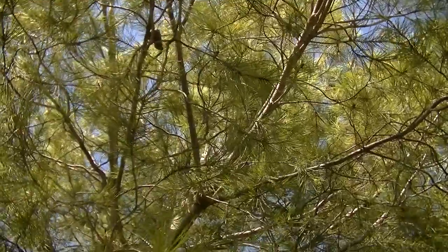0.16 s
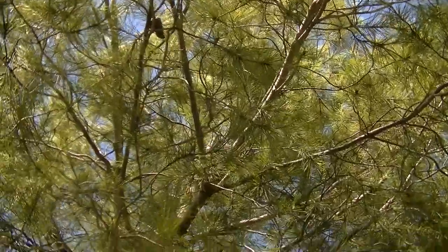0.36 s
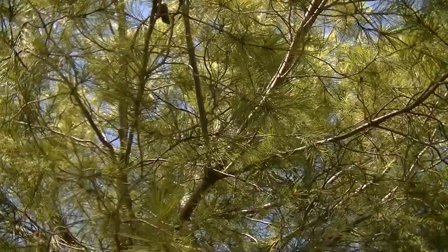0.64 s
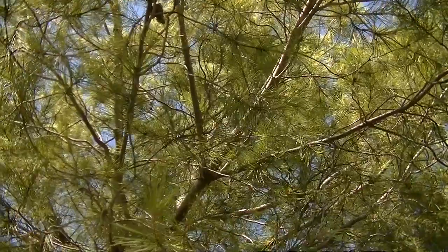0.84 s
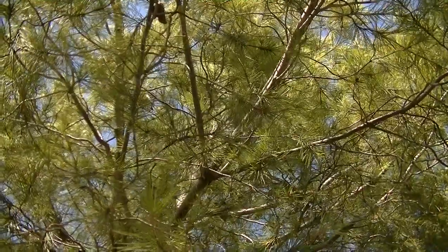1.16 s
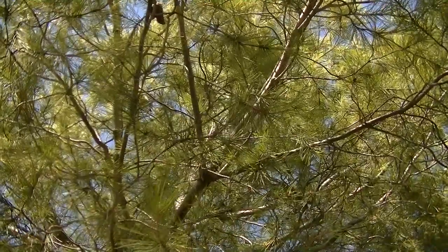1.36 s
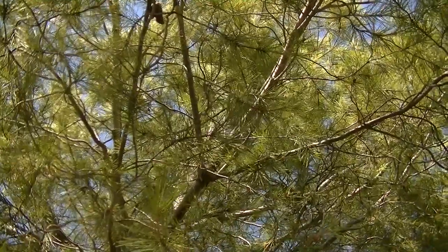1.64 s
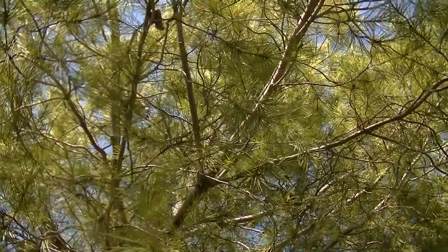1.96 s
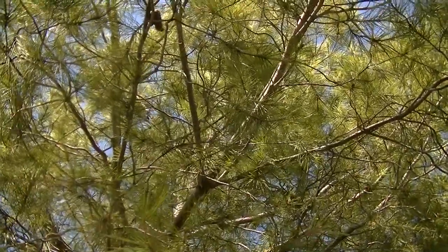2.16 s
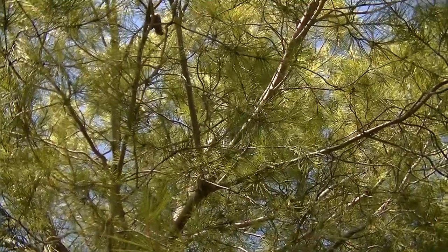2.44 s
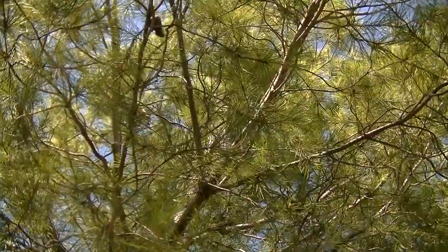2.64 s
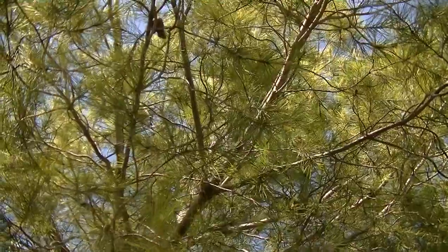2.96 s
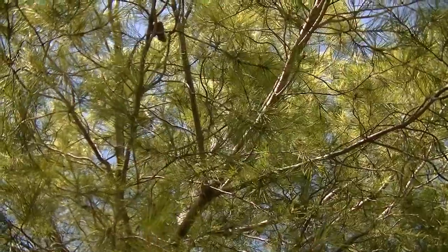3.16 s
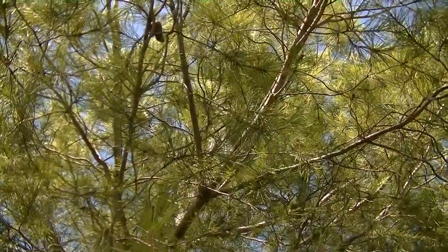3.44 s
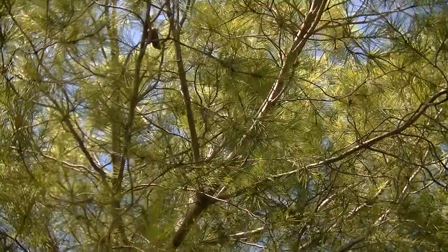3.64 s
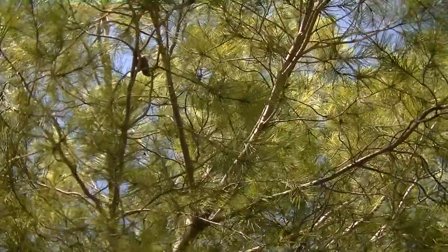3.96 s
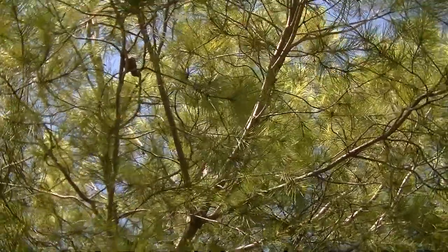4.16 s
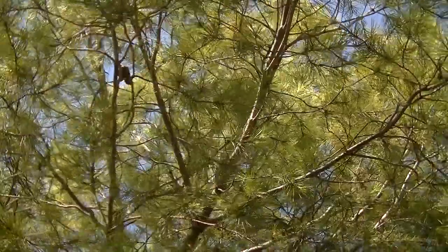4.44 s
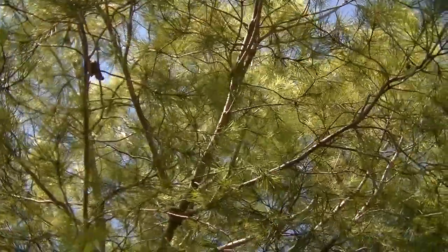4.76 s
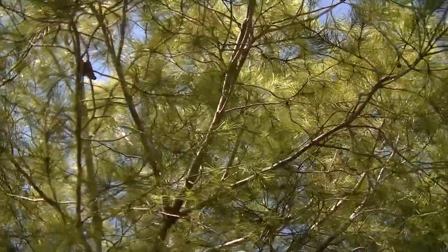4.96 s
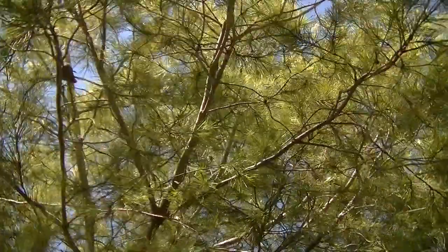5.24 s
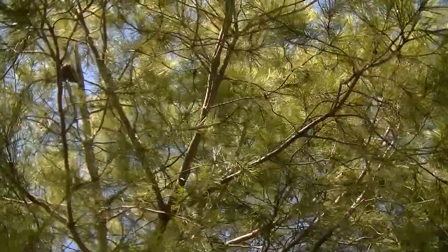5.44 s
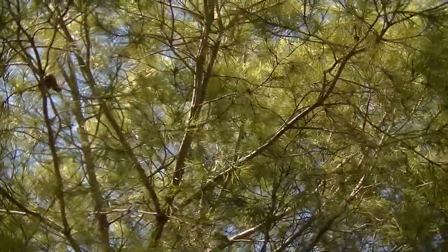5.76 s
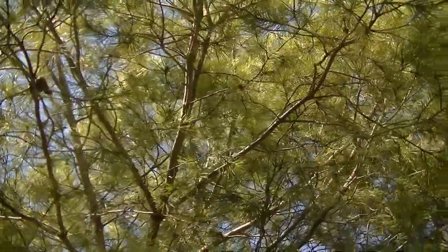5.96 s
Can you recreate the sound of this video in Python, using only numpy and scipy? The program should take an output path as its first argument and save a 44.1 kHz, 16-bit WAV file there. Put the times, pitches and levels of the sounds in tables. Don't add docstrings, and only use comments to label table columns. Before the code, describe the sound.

Outdoors under a pine, a lone cicada close overhead gives a steady, high, raspy buzz that eases slightly for over two seconds, then turns into fast throbs, about eleven a second, growing louder to the end. A hand-held camera's stereo microphones catch low wind bumps and a hard final slap. Far traffic washes faintly behind, with soft needle rustles later.

```python
import sys
import numpy as np
from scipy import signal
from scipy.io import wavfile
from scipy.ndimage import uniform_filter1d

SR = 44100
rng = np.random.default_rng(int(sys.argv[2]) if len(sys.argv) > 2 else 0)


def master_out(mix):
    frames = np.transpose(np.atleast_2d(mix))
    ceiling = np.clip(frames, -1, 1)
    pcm = np.round(ceiling * 32767).astype(np.int16)
    wavfile.write(sys.argv[1], SR, pcm)


def makeup_ratio(level_db):
    decades = np.asarray(level_db, float) / 20
    return 10 ** decades


N = 268569


def evened(x):
    return x / np.sqrt(np.mean(np.square(x)) + 1e-20)


def read_spectrum(points, hz):
    f, value = np.transpose(points)
    return np.interp(np.log(hz + 1), np.log(f + 1), value)


def curves(rows, t):
    s, *columns = np.transpose(rows)
    return [np.interp(t, s, c) for c in columns]


def resonate(x, hz, width):
    turn = np.exp(2j * np.pi * np.cumsum(hz * np.ones(len(x))) / SR)
    r = np.exp(-np.pi * width / SR)
    smooth = signal.lfilter([(1 - r) ** 2], [1, -2 * r, r * r], x / turn)
    return 2 * (turn * smooth).real


def hiss(spectrum, likeness, patchy_db, size):
    frames, hz = 4 * N // size + 5, np.fft.rfftfreq(size, 1 / SR)
    a, b, c, d, patches = rng.standard_normal((frames, len(hz), 5)).T
    patches = uniform_filter1d(patches, size=12, axis=0)
    patches = evened(uniform_filter1d(patches, size=10, axis=1))
    same = np.clip(read_spectrum(likeness, hz), -1, 1)[:, None]
    left = a + 1j * b
    right = same * left + np.sqrt(1 - same ** 2) * (c + 1j * d)
    z = np.array([left, right]) * makeup_ratio(read_spectrum(spectrum, hz)[:, None] + patchy_db * patches)
    return evened(signal.istft(z, nperseg=size, noverlap=size * 3 // 4)[1][:, :N])


# [f/Hz, level/dB per Hz]
WASH_SPECTRUM = [(18, -29), (30, -10), (75, 2), (142, -4.5), (232, -4.5), (476, -8), (916, -8),
                 (1630, -17.5), (3000, -22), (8000, -11), (15500, -47)]
# [t/s, level/dB]
WASH_LEVEL = [(0.0, -57.5), (1.25, -57.3), (3.17, -54.3), (6.09, -54.3)]
# [f/Hz, left-right likeness]
WASH_LIKENESS = [(100, 0.89), (500, .75), (1000, 0.79), (2500, 0.56), (8000, 1), (13000, .2)]
# [f/Hz, width/Hz, start t/s, stop t/s, level/dB]
HUMS = [
    (250, 3, 0.53, 2.9, -61.5),
    (420.6, 2.5, 1.5, 3.33, -66),
]


def traffic():
    t = np.arange(N) / SR
    out = makeup_ratio(curves(WASH_LEVEL, t)[0] + 6.5) * hiss(WASH_SPECTRUM, WASH_LIKENESS, 0.9, size=1024)
    for hz, width, start, stop, db in HUMS:
        passing = np.clip(np.minimum(t - start, stop - t) / 0.27, 0, 1)
        out += makeup_ratio(db) * passing * evened(resonate(rng.standard_normal(N), hz, width))
    return out


# [t/s, length/s, level/dB, centre f/Hz]
RUSTLES = [
    (3.7, 0.17, -65, 1969),
    (4.1, 0.11, -62, 2298),
    (4.341, .03, -63, 1500),
    (5.454, 0.11, -59.5, 2005),
    (5.715, 0.059, -61, 1798),
]


def rustles():
    t, out = np.arange(N) / SR, np.zeros((2, N))
    a, b = rng.standard_normal((2, N))
    for s, length, db, hz in RUSTLES:
        swell = np.exp(-((t - s) / length) ** 2)
        brush = [resonate(v, hz, 1500) for v in (a + 0.45 * b, a - 0.36 * b)]
        out += makeup_ratio(db) * swell * evened(brush)
    return out


# [peak t/s, level/dB, rise/s, fall/s, edge level/dB]
GUSTS = [(0.0, -46.5, .1, .2, -14), (0.2, -44, .05, .22, -8), (0.41, -37.5, .06, .02, -4),
         (0.88, -46.5, .11, .11, 0), (1.03, -37, .05, .07, 2), (1.19, -39, .11, .015, 2),
         (1.32, -40, .2, .04, -3), (1.52, -41, .04, .15, 8), (1.63, -48, .08, .05, 9),
         (1.91, -48, .1, .5, -4), (2.29, -44, .06, .15, -3), (2.46, -41.5, .12, .07, -8),
         (2.6, -49, .15, .05, -4), (2.7, -43.5, .04, .065, -1), (3.61, -43.5, .035, .25, -4),
         (3.71, -42, .1, .07, -8), (3.92, -34, .11, .025, 2), (4.02, -42, .05, .045, 0),
         (4.14, -40.5, .03, .017, -6), (4.21, -42.5, .025, .045, -2), (4.31, -43.5, .035, .055, -2),
         (4.46, -38, .09, .043, 3), (5.34, -43, .2, .12, -1), (5.48, -39.5, .04, .1, -8)]
# [peak t/s, level/dB, rise/s, fall/s, edge level/dB]
LAST_GUST = (6.01, -36, .06, .018, 19)


def gusts(t):
    calm_db, calm_edge_db = -63, -6
    slope_db = -12
    body, edge = makeup_ratio(calm_db) ** 2, makeup_ratio(calm_db + calm_edge_db) ** 2
    for s, db, rise, fall, edge_db in GUSTS + [LAST_GUST]:
        power = makeup_ratio(db + slope_db * np.maximum((s - t) / rise, (t - s) / fall)) ** 2
        body = body + power
        edge = edge + power * makeup_ratio(edge_db) ** 2
    return np.sqrt(body), np.sqrt(edge)


# [f/Hz, level/dB per Hz]
BUFFET_SPECTRUM = [(12, -37), (20, -13.5), (60, -0.5), (97, -2.5), (151, -7.5), (184, -20), (262, -27.5),
                   (404, -41), (700, -64), (910, -70), (1540, -120)]
# [t/s, peak level/dB, f/Hz, share on the right]
SLAPS = [(.398, -24, 160.1, 1.54), (1.033, -21, 130, 0.65), (1.058, -36, 300, 1.1), (1.571, -37, 260, 1.8),
         (2.343, -38, 250, 1.9), (2.7, -39, 220, 1), (3.859, -33, 260, 1.8), (3.914, -24, 151, 0.34),
         (4.435, -41, 240, 0.98), (5.348, -34, 120, .9), (5.99, -15, 100.3, 0.36), (5.997, -23, 270, 0),
         (6.0075, -26, 320, 3), (6.014, -24, 280, -.2), (6.02, -7.5, 150, 0.66)]


def wind():
    body, edge = gusts(np.arange(N) / SR)
    air = hiss(BUFFET_SPECTRUM, [(30, -0.92), (300, -0.69)], 2.8, size=2048)
    air /= uniform_filter1d((air ** 2).mean(0), size=2500) ** 0.27
    low = signal.sosfiltfilt(signal.butter(2, 190, fs=SR, output="sos"), air)
    out = makeup_ratio(10) * (body * low + makeup_ratio(2.5) * edge * (air - low)) * makeup_ratio([[-1.5], [.8]])
    t = np.arange(-800, 800) / SR
    for s, db, hz, right in SLAPS:
        slap = makeup_ratio(db) * np.cos(2 * np.pi * hz * t) * np.exp(-(t * hz / 0.42) ** 2)
        middle = round(s * SR)
        out[:, middle - 800:middle + 800] += slap * np.array([[1], [-right]])
    return out


def branches(x, t60=.075):
    at = np.arange(30, 5000, 20) + rng.integers(0, 20, (3, 2, 249))
    taps = np.zeros((3, 2, 5100))
    np.put_along_axis(taps, at, rng.choice([-1., 1.], at.shape) * makeup_ratio(-60 * at / SR / t60), 2)
    drift = 2 * np.pi * (1.3 * np.arange(N) / SR + np.arange(3)[:, None] / 3)
    fed = x * np.sqrt(2 / 3) * np.cos(drift / 2)
    return signal.oaconvolve(fed[:, None], taps / np.linalg.norm(taps[0, 0]), axes=2).sum(0)[:, :N]


SWELLING = [2.3898, 2.4556, 2.533, 2.6078, 2.6868, 2.7678, 2.86, 2.9373, 3.0296, 3.1152, 3.2004, 3.2844,
            3.3756, 3.465, 3.5484, 3.6375, 3.7254, 3.8121, 3.902, 3.9899]
FULL_VOICE = [4.0759, 4.1631, 4.2597, 4.3457, 4.4431, 4.5298, 4.625, 4.7124, 4.7989, 4.8943, 4.9861, 5.0749,
              5.1636, 5.2598, 5.3488, 5.4364, 5.5251, 5.6133, 5.7027, 5.7997, 5.8888, 5.9779, 6.0654]


def throbs():
    starts = np.array(SWELLING + FULL_VOICE)
    return starts, np.append(np.diff(starts), .089)


# [t/s, strokes per s, effort level/dB]
DRONE = [(0, 94.7, -39), (0.398, 94.3, -40.5), (0.8, 91.4, -42.5), (1.199, 90.3, -42.5),
         (1.599, 90.6, -43.5), (2.002, 88.9, -43.5), (2.37, 87.6, -43.5)]
# [share of length 0-1, slowing 0-1, fading 0-1, sac opening level/dB, sac rise 0-1]
COURSE = [
    (0, 0.02, 0.81, -4.5, .1),
    (.08, 0.02, 0.37, 1, 0.2),
    (.2, 0, 0, 1, 0.59),
    (.35, 0.02, 0, -2, 0.86),
    (.5, .05, 0.19, -8.5, 0.4),
    (.65, .5, .4, -6, .5),
    (.8, 0.96, 1.0, -9.5, 0.23),
    (1, 1, 0.4, -5, 0),
]
# [t/s, fast strokes per s, body tuning factor,
# sac rise as share of pitch, sac ring level/dB]
DRIFT = [(2.37, 130, 0.99, .03, 0), (2.8, 152, 1.0, 0.14, -2), (3.3, 150, 1.0, 0.18, 1),
         (4.0, 143, 1.032, 0.053, 4.5), (4.6, 159, 1.023, .04, 5.5), (5.0, 158, 1.015, .1, 0.5),
         (6.1, 151, 1.05, 0.11, 3.5)]


def strokes():
    slow_per_s = 97
    t = np.arange(0, DRONE[-1][0] + .008, 1 / SR)
    turns = np.cumsum(curves(DRONE, t)[0]) / SR
    times = [t[1:][np.diff(np.floor(turns - turns[-1] + .57)) > 0]]
    share = np.linspace(0, 1, num=400)
    slowing = np.cumsum(curves(COURSE, share)[0]) / len(share)
    for s, length in zip(*throbs()):
        fast = curves(DRIFT, s)[0]
        lost = slowing * (fast - slow_per_s) * length
        whole = np.round(fast * length - lost[-1])
        turns = fast * length * share - lost * (fast * length - whole) / lost[-1]
        times.append(s + length * np.interp(np.arange(whole), turns, share))
    return np.concatenate(times)


# [t/s, effort level/dB, depth of the fading end/dB,
# microphone facing the insect 0-1, air sac filling level/dB]
PUMPING = [(2.39, -43.5, 0, 0, .8), (2.65, -39, -5.5, 0, 0), (3.1, -37.8, -5.3, .05, -1.2),
           (3.25, -36, -6.5, 0, -.5), (3.65, -35.9, -4.2, 0, 1.2), (4.5, -34.1, -4, 0, 1.3),
           (4.65, -33.8, -3, .05, -1.8), (4.9, -35.8, -1, .4, .8), (5.0, -33.2, -2.5, .4, -.8),
           (5.5, -32.9, -3.2, .7, -2.5), (5.7, -34.2, -3.9, 1, 2)]
# [drone level/dB, throb level/dB, extra dB per dB of effort, gain when faced/dB]
LAYERS = [
    (-7.3, -7, .55, -.6),
    (0, 0, 0, 0),
    (-16.4, -15.5, -.03, 6.2),
    (-18.2, -21.8, -.65, 6.5),
]


def controls(t):
    starts, lengths = throbs()
    throb = np.clip(np.searchsorted(starts, t + .001) - 1, 0, len(starts) - 1)
    share = (t - starts[throb]) / lengths[throb]
    _, fading, opening_db, rise = curves(COURSE, share)
    _, body_tuning, reach, swelling_db = curves(DRIFT, t)
    pumping = t > starts[0] - .005
    throb_db, end_db, facing, filling_db = curves(PUMPING, starts[throb])
    effort_db = np.where(pumping, throb_db, curves(DRONE, t)[1])
    levels_db = []
    for drone_db, throbs_db, slope, faced_db in LAYERS:
        base_db = np.where(pumping, throbs_db + faced_db * facing, drone_db)
        levels_db.append(effort_db + base_db + slope * (effort_db + 40))
    levels_db[0] = levels_db[0] + pumping * (opening_db + filling_db)
    fade_db = pumping * fading * end_db
    sac_tuning = 1 + pumping * rise * reach
    tension = pumping * (1 - fading) * reach / .1
    return pumping, levels_db, fade_db, swelling_db, sac_tuning, body_tuning, tension


# [drone delay/ms, throb delay/ms, level/dB, brightness/dB, tilt/dB]
RIBS = [
    (0, -0.5, 1.3, 2.5, -4),
    (1.6, 1.67, 3, -5, 5),
    (5.5, 3.5, 0, -5.5, -4),
    (7.3, 5.5, 1, -9.5, 6),
]
# [f/Hz, width/Hz, drone level/dB, throb level/dB, share of the fading, rise of pitch at full effort]
SAC = [(3658, 190, -17, -26, 1.0, 0), (4502, 340, -1.8, -5.5, 0.8, 0), (4925, 500, -6.5, -5.5, 0.4, 0),
       (5440, 640, -2, 2, 1.3, 0)]
BODY = [(6247, 360, -4.5, -9.5, 0.81, 0), (6672, 670, 1.8, 2.8, 2.3, 0.0036),
        (7230, 424, -0.3, 0, 1.6, 0.0072), (7724, 750, -5.5, -7.6, 3.5, 0.022)]
UPPER = [(8684, 340, 2.5, -1.5, 3, 0.009), (9400, 1000, 3.5, 1.5, 3.0, 0.013),
         (9960, 320, -4, -3, 2.6, 0.0031), (10540, 1000, 4, 2.5, 1.8, 0.0075)]
TOP = [(11800, 1200, -1, 5.5, .9, 0.02), (12760, 760, 4, 0.5, 0.6, 0.035), (13350, 900, -2, 0, 1.6, .02),
       (15000, 1200, -12, -11, 1, 0)]


def cicada(steady_s=.00003, hurried_s=.0001, uneven_db=1.15):
    at, t = strokes(), np.arange(N) / SR
    pumping, levels_db, fade_db, swelling_db = controls(at)[:4]
    sac_tuning, body_tuning, tension = controls(t)[4:]
    chance = rng.standard_normal((len(at), len(RIBS), 18))
    jitter_s = np.where(pumping, hurried_s, steady_s)[:, None]
    drone_ms, throb_ms, rib_db, bright_db, tilt_db = np.transpose(RIBS)
    delay = np.where(pumping[:, None], throb_ms, drone_ms) / 1000
    place = np.clip((at[:, None] + delay + jitter_s * chance[..., 0]) * SR, -11, N).astype(int)
    stagger = rng.integers(0, 11, (18, len(RIBS)))
    song, k = np.zeros((2, N)), 1
    for layer, modes in enumerate((SAC, BODY, UPPER, TOP)):
        for hz, width, drone_db, throb_db, fades, arch in modes:
            k += 1
            moving = layer == 0 and hz == SAC[-1][0]
            sac_db = (layer == 0) * (moving - .4) * swelling_db
            mode_db = np.where(pumping, throb_db + sac_db, drone_db)
            size_db = (levels_db[layer] + fades * fade_db + mode_db)[:, None]
            size_db = size_db + rib_db + bright_db * layer / 3
            size_db += uneven_db * (chance[..., 1] + chance[..., k])
            size_db += tilt_db * np.clip((hz - 6800) / 800, -1, 1) * (layer < 2)
            onset = place + stagger[k] + 11
            clicks = np.bincount(onset.ravel(), makeup_ratio(size_db).ravel(), N + 22)[12:N + 12]
            tuning = sac_tuning if moving else (body_tuning if layer % 2 else 1) + arch * tension
            ring = resonate(clicks, hz * tuning, width) * np.sqrt(SR / width)
            song[layer // 2] += (-1) ** k * ring
    return makeup_ratio(11.5) * signal.sosfilt(signal.butter(4, 3800, "high", fs=SR, output="sos"), song)


# [t/s, left minus right level/dB of low rings, of high rings]
LEAN = [(0, -2.3, 1.5), (5.3, -1.3, .5), (6.1, -1, 1.5)]


def scene():
    background = traffic() + rustles() + wind()
    low, high = cicada()
    sides = np.array([[.5], [-.5]])
    low_db, high_db = np.array(curves(LEAN, np.arange(N) / SR))[:, None] * sides
    scatter = branches(makeup_ratio(-8.5) * low + makeup_ratio(-4.0) * high)
    return low * makeup_ratio(low_db) + high * makeup_ratio(high_db) + scatter + background


def roll_off(x):
    return signal.sosfilt(signal.butter(12, 15770, fs=SR, output="sos"), x)


def record(dry):
    return roll_off(dry)


dry = scene()
out = record(dry)
master_out(out)
```